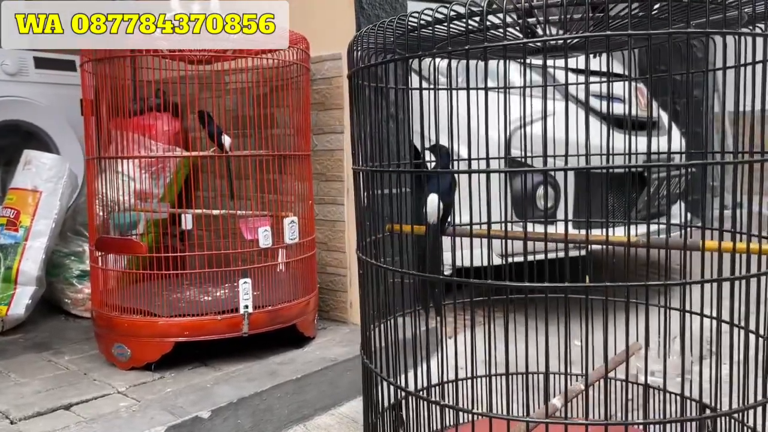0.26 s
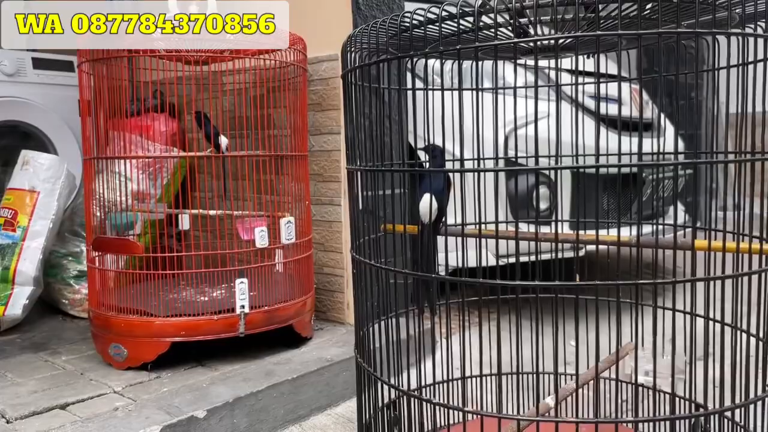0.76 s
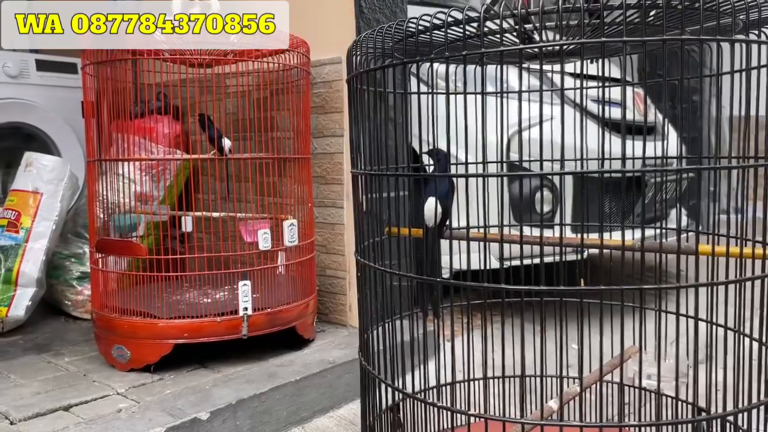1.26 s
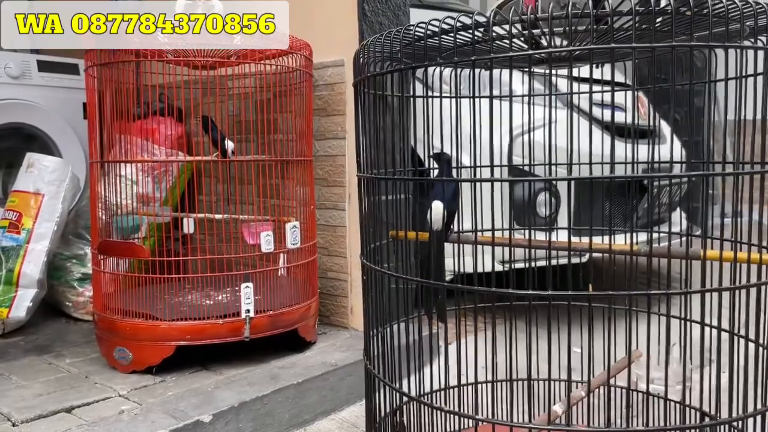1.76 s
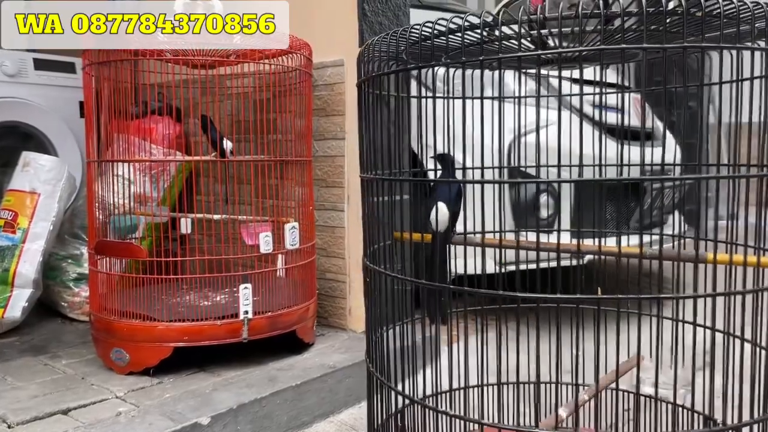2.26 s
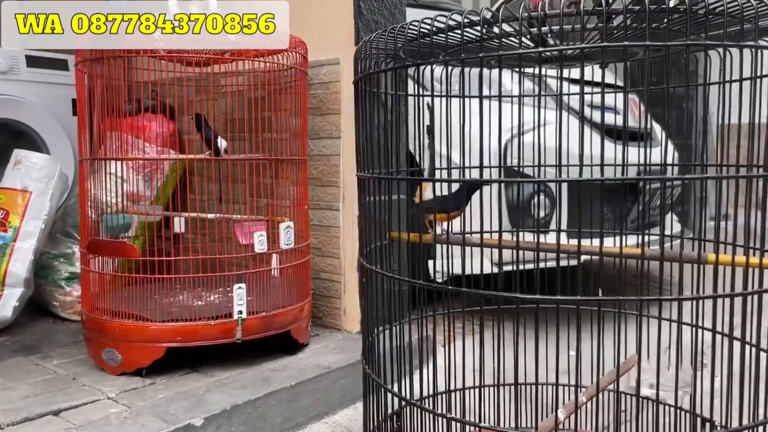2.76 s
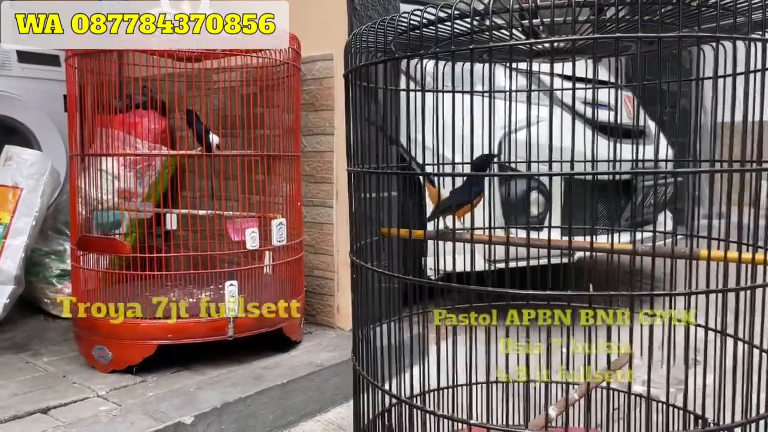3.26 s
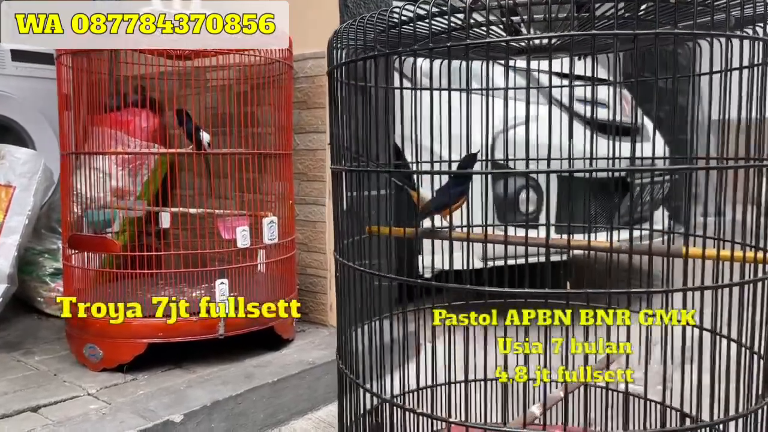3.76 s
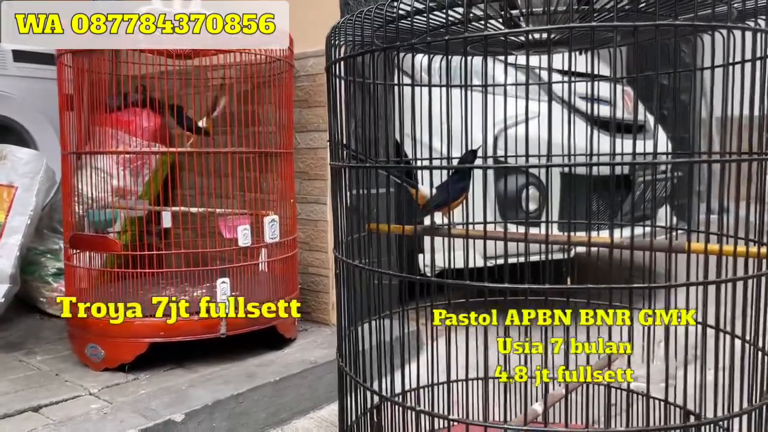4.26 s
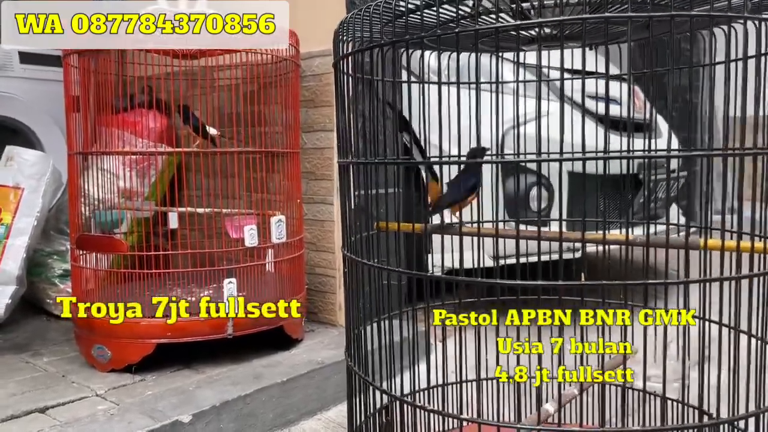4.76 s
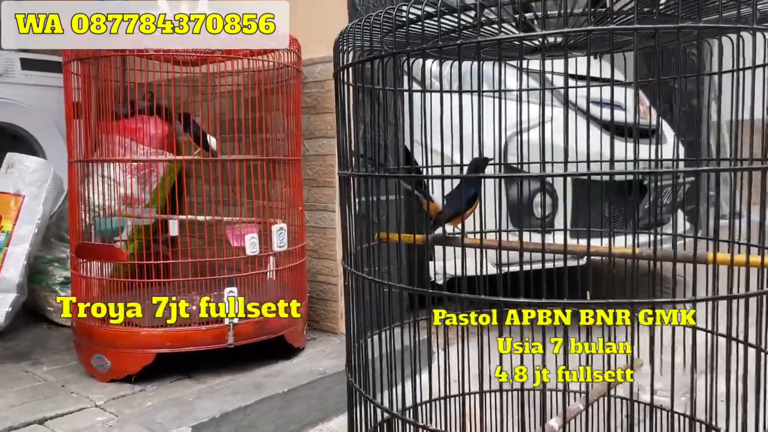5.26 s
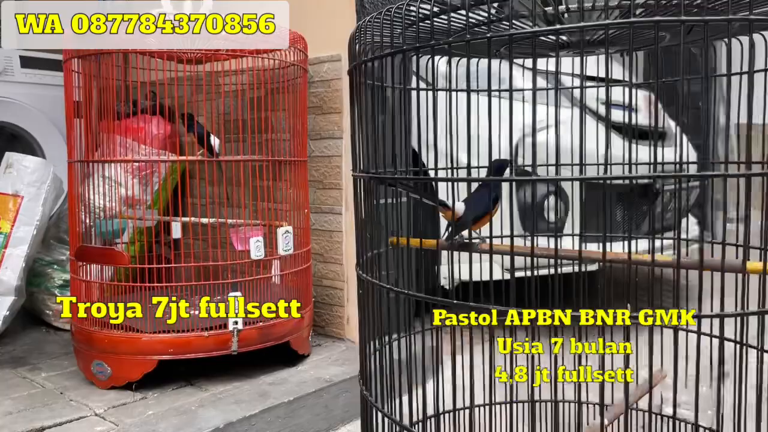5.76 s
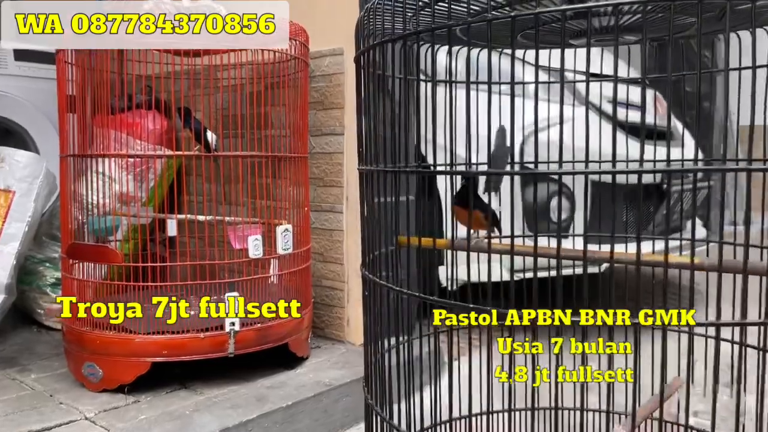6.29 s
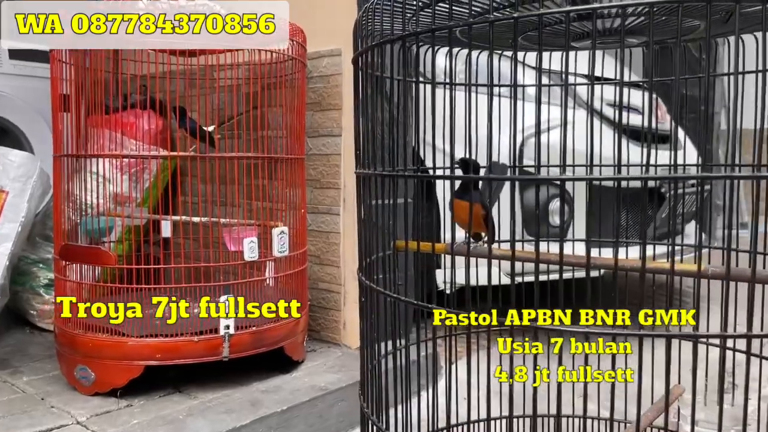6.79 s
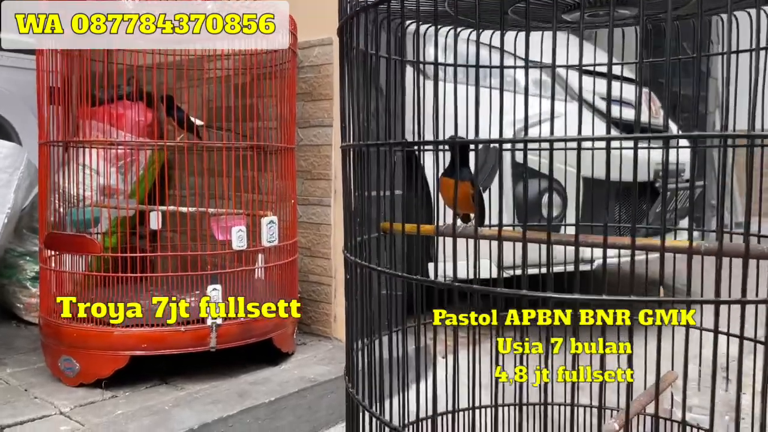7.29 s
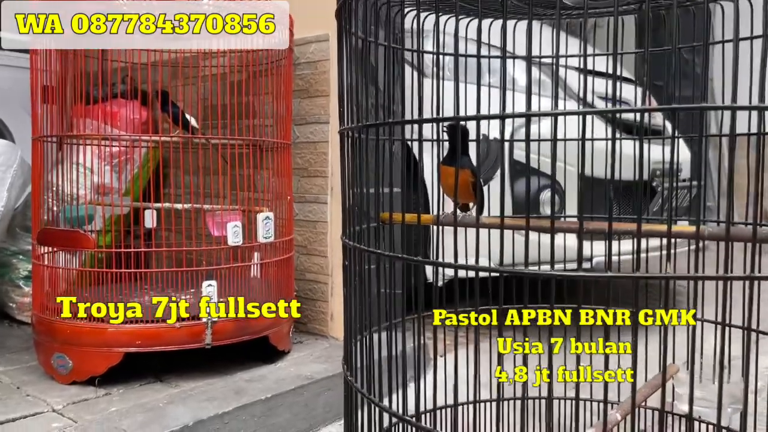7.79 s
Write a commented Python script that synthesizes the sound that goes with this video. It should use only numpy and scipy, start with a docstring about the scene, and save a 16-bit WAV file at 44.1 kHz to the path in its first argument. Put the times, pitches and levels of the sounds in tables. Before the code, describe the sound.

A caged shama sings close to the microphone on a hard-walled porch. Short rising and falling whistles mix with three low hoots, then a quick, even trill runs for over a second. Varied slurred phrases follow, some dipping lower, before a pause with small cage taps and a few softer rising whistles. Faint distant birds and low street rumble lie underneath, with a tail of nearly a second.

```python
"""A short rising whistle and far-off birds are heard first over street rumble, then three low hoots and cage taps.
The whistle is a caged shama near the microphone on a hard-walled porch: falling notes, a fast trill, rising whistles.
Each of its notes is a slur: a near-pure tone with faint overtones that bends in pitch, swells to a crest and fades.
Far birds are thin slurs, hoots are sagging tones, taps are noise coloured by the cage bars, the street is shaped noise.
The walls add quick reflections and a tail that lasts almost a second."""
import sys
import numpy as np
from scipy import signal
from scipy.fft import rfft, irfft
from scipy.io import wavfile
from scipy.ndimage import map_coordinates

SR = 44100
rng = np.random.default_rng(int(sys.argv[2]) if len(sys.argv) > 2 else 0)


def pcm_store(signal):
    """Save signal as 16-bit PCM."""
    levels = np.round(np.clip(np.atleast_2d(signal), -1, 1) * 32767)
    wavfile.write(sys.argv[1], SR, levels.astype(np.int16).T)


N = 354123  # length of the scene in samples

# Steady street noise. Each point: frequency in Hz, relative strength in dB per Hz.
STREET_COLOUR = [(18, -70), (30, -24.5), (102, -2.5), (225, -13.5), (410, -10), (532, -18), (787, -15),
                 (1680, -21), (1870, -16), (2130, -23.5), (2300, -20), (3400, -22), (3880, -23),
                 (4420, -25), (15500, -43.5)]
STREET_DB = -48.5
# Loudness of the low traffic drone over time. Each point: time in seconds, level in dB.
DRONE_LEVELS = [(0, -48), (2.5, -59.5), (4.068, -45), (4.6, -50.5), (8.03, -50)]
DRONE_HZ, DRONE_OCTAVE_HZ = 102.3, 192
# Soft low thumps. Each row: start in seconds, length in seconds, pitch in Hz, level in dB.
THUMPS = [(5.257, 0.057, 89.7, -34.5), (5.279, 0.21, 65, -34.5), (5.574, 0.25, 65.6, -46),
          (7.141, 0.11, 64, -47)]

# In a slur, bend 1 is a straight slide, above 1 lingers on the first pitch, below 1 leaves it at once.
# The crest is the share of the length at which the note is loudest.
# Drawn-out rising whistles. Each row: start in seconds, length in seconds, from pitch in Hz, to pitch in Hz,
# bend, level in dB, crest from 0 to 1, overtone level in dB (before the beak and the mix colour it).
RISING_NOTES = [(0, 0.067, 2380, 2613, 0.41, -9.5, 0, -56.5),
                (0.078, 0.05, 1780.0, 2130, 0.51, -22.5, 0.71, -67),
                (0.453, 0.21, 2363, 2865, 0.72, -12.5, 0.2, -60.0),
                (0.548, 0.098, 2873, 2923, 1.2, -24, 0.43, -56),
                (0.808, 0.12, 2466, 2837, 1.12, -14.5, 0.22, -57.5),
                (2.739, 0.075, 2674, 3465, 1.66, -22.0, 0.37, -59.0),
                (2.898, 0.098, 1490, 1942, 1.04, -11, 0.62, -58.5),
                (2.983, 0.062, 2040, 2510, 1.03, -16.5, 0.35, -60.5),
                (3.309, 0.091, 2443, 2646, 0.62, -19.5, 0.11, -72.5),
                (3.387, 0.069, 2087, 2195, 0.28, -9, 0.63, -62),
                (4.12, 0.056, 1946, 2124, 1, -22, 0.75, -68.5),
                (4.168, 0.046, 2153, 2225, 0.78, -7, 0.4, -57.5),
                (4.427, 0.092, 2097, 2568, 0.61, -11, 0.46, -74.5),
                (4.926, 0.082, 2663, 2880, 1.25, -14.0, 0.68, -58),
                (4.975, 0.13, 2850, 3916, 0.64, -21, 0.08, -56),
                (5.335, 0.059, 2488, 2960, 6, -15.5, 0.61, -53.5),
                (5.493, 0.174, 1393, 1822, 0.71, -12.5, 0.36, -64.0),
                (5.881, 0.099, 1122, 1805, 0.58, -14.0, 0.59, -60),
                (5.981, 0.027, 2140, 2520, 0.67, -24.5, 0.4, -58.5),
                (7.203, 0.18, 2284, 2735, 0.98, -21.5, 0.8, -66.5),
                (7.493, 0.14, 2340, 2602, 1.3, -18, 0.95, -64),
                (7.707, 0.13, 2001, 2447, 0.56, -16, 0.74, -65),
                (7.89, 0.076, 2120, 2230, 1.5, -18, 0.9, -63),
                (7.957, 0.041, 2338, 2455, 0.55, -15.5, 0.3, -57.5)]
RISE_SWELL_DB_PER_S, RISE_FADE_DB_PER_S = 220, 161  # gained up to the crest, lost after it
RISE_EASE = 0.5  # how far a rise levels off at both ends, 0-1
# Clipped falling notes. Each row: start in seconds, length in seconds, from pitch in Hz, to pitch in Hz,
# bend, level in dB, crest from 0 to 1, overtone level in dB (before the beak and the mix colour it).
FALLING_NOTES = [(0.14, 0.041, 2094, 2048, 0.9, -10, 0.62, -54),
                 (0.179, 0.024, 2088, 1693, 1.4, -3, 0.49, -49.5),
                 (0.261, 0.044, 2229, 2143, 1.5, -9, 0.6, -62.5),
                 (0.301, 0.022, 2030, 1795, 0.95, -8, 0.2, -58.5),
                 (0.359, 0.057, 2490.0, 2187, 0.55, -8.5, 0.46, -55.5),
                 (0.7, 0.074, 2340.0, 1832, 1.82, -6.5, 0.41, -59),
                 (0.977, 0.072, 2280.0, 1842, 2.08, -7.5, 0.48, -64.5),
                 (1.087, 0.06, 2360.0, 1984, 2.37, -7, 0.44, -58),
                 (2.652, 0.064, 2550.0, 1992, 0.86, -9.5, 0.47, -56.5),
                 (3.13, 0.105, 1578, 1215, 1.91, -14.5, 0.33, -67),
                 (4.274, 0.082, 1819, 1417, 3.06, -8, 0.45, -57),
                 (4.567, 0.086, 2200.0, 1735, 1.46, -13.5, 0.5, -57.5),
                 (4.679, 0.058, 2370.0, 2008, 1.2, -7.5, 0.41, -58.5),
                 (4.774, 0.06, 2450.0, 2030, 1.3, -8, 0.49, -56.5),
                 (4.887, 0.061, 3010.0, 2490, 0.68, -23, 0.12, -55),
                 (5.21, 0.064, 2230.0, 1553, 3.2, -7.5, 0.3, -51.0),
                 (5.279, 0.048, 2200.0, 1787, 4.6, -7, 0.29, -51),
                 (5.457, 0.055, 1880.0, 1270, 1.74, -16, 0.39, -57),
                 (5.804, 0.088, 1300.0, 1141, 1.2, -19.5, 0.76, -68.0)]
FALL_SWELL_DB_PER_S, FALL_FADE_DB_PER_S = 404, 269.5
# The trill repeats one note that holds its top pitch and then drops.
# Each row: start in seconds, length in seconds, pitch it drops to in Hz, level in dB.
TRILL_NOTES = [(1.183, 0.046, 2065, -7), (1.279, 0.053, 1945, -9.5), (1.375, 0.057, 1984, -9),
               (1.476, 0.054, 1917, -10), (1.572, 0.053, 1946, -12), (1.671, 0.045, 1827, -8),
               (1.762, 0.052, 1833, -9), (1.849, 0.06, 1823, -7.5), (1.948, .051, 1817, -9),
               (2.049, 0.053, 1880, -8.5), (2.15, .047, 1940, -9), (2.249, 0.059, 1943, -8.5),
               (2.356, 0.045, 1950, -8), (2.456, 0.055, 1944, -8.5), (2.557, 0.051, 1950, -10.5)]
TRILL_TOP_HZ, TRILL_BEND, TRILL_CREST, TRILL_OVERTONE_DB = 2358, 2.88, 0.58, -54.5
TRILL_SWELL_DB_PER_S, TRILL_FADE_DB_PER_S = 433, 387
TRILL_EASE = 0.75  # how far the drop levels off at both ends, 0-1
# Colour of the overtones as they leave the beak. Each point: frequency in Hz, gain in dB.
BEAK_COLOUR = [(2500, -3), (4000, 0.5), (4750, -5.5), (6000, -4), (7000, -11), (8000, 0), (9200, 7),
               (10500, 0), (12000, -4.5), (14000, -9.5), (16000, -10)]
FLUTTER_DB, FLUTTER_PER_S = 2, 105.8  # unsteadiness of the level within any note
NOTE_EDGE_S = 0.0072  # time the syrinx, the bird's voice organ, takes to start and stop
TOP_HZ = 15850  # highest frequency that is kept

# Calls of birds further off; the two rows near 6 kHz are octave overtones of calls near 3 kHz.
# Each row: start in seconds, length in seconds, from pitch in Hz, to pitch in Hz,
# level in dB before the mix lifts it.
FAR_CALLS = [(0, 0.073, 1191, 1069, -32.5), (0, 0.082, 3297, 2804, -34.5),
             (0.052, 0.064, 1245, 1596, -37.5), (0.932, 0.16, 3780, 4576, -50.5),
             (2.41, 0.22, 4490, 5110, -59.5), (3.083, 0.13, 3240, 2810, -41.5),
             (3.071, 0.067, 6260, 6160, -52.5), (3.191, 0.052, 4960, 4040, -48.5),
             (3.315, 0.055, 3260, 3930, -47.5), (3.447, 0.097, 4170, 3950, -53),
             (3.654, 0.17, 2490, 2420, -46.5), (3.871, 0.13, 2208, 2073, -48.5),
             (4.165, 0.24, 4030, 4930, -52.5), (4.456, 0.19, 4960, 5170, -56.5),
             (6.669, 0.17, 3000, 3345, -57.5), (6.656, .112, 5920, 6560, -67),
             (6.815, 0.079, 3194, 2990, -51), (6.888, 0.19, 3205, 3510, -54),
             (7.066, 0.019, 2540, 2430, -40.5), (7.068, 0.063, 4480, 4330, -62),
             (7.13, 0.13, 3485, 3335, -54), (7.545, 0.13, 3290, 3160, -58),
             (7.756, 0.05, 4660, 3710, -52.5), (7.921, 0.04, 5090, 3920, -53)]
# Low hoots. Each row: start in seconds, length in seconds, starting pitch in Hz, level in dB.
HOOTS = [(.05, 0.07, 366, -11), (.183, .076, 389.7, -13), (0.326, 0.067, 391.5, -11.5)]
HOOT_SAG, HOOT_BEND = 0.26, 4.1  # share of its pitch that a hoot loses, late in the note
# Taps of bill and claws on the cages. Each row: start in seconds, level in dB before the tap dies away,
# gain of treble over middle in dB, ring time in seconds to fall by 60 dB.
TAPS = [(0.274, -25, 19, 0.015), (0.291, -24, -19, 0.02), (2.384, -35.5, -24, 0.061),
        (2.5588, -32, -13, 0.015), (2.815, -26, -38, 0.015), (4.448, -22.5, -3, 0.014),
        (4.6574, -31.5, -26, 0.043), (5.722, -50, 29, 0.018), (5.909, -23.5, -13, 0.04),
        (6.1458, -23, -12.5, 0.034), (6.153, -32, 26, 0.016), (6.2857, -22.5, -9.5, 0.012),
        (6.891, -48, -32, 0.042), (7.0749, -55, -17, 0.025), (7.396, -41, 4, 0.017)]
# Resonances of the cage bars. Each row: frequency in Hz, width in Hz, strength in dB.
CAGE_RESONANCES = [(1475, 1400, -8), (3170, 1200, -1.5), (5260, 420, 4), (5800, 600, -2),
                   (7800, 2600, -0.5), (11800, 4400, -14.5)]
# Reverberation of the porch. Each row: frequency in Hz, time in seconds to fall by 60 dB.
PORCH_DECAY = [(350, 0.86), (1500, 0.8), (2500, 0.87), (5000, 0.66), (9000, 0.6), (15000, 0.53)]


def undb(db):
    """Decibels to gain."""
    return 10 ** (np.asarray(db) / 20)


def unit(x):
    """Scale to an average strength (rms) of 1."""
    return x / np.sqrt(np.mean(x ** 2))


def along(points, hz):
    """Read (Hz, value) points on a log-frequency axis."""
    f, value = np.transpose(points)
    return np.interp(np.log(np.maximum(hz, 1)), np.log(f), value)


def add(out, start, x):
    """Mix x into out at a time in seconds."""
    i = max(int(start * SR), 0)
    out[i:i + len(x)] += x[:max(N - i, 0)]


def wander(n, rate):
    """Smooth chance with a spread near 1 that changes rate times a second."""
    at = np.arange(n) * rate / SR
    return map_coordinates(rng.standard_normal(512), [at], order=3, mode="wrap")


def tinted(n, gain):
    """Noise of rms 1 whose spectrum follows the function gain(Hz)."""
    hz = np.arange(n // 2 + 1) * SR / n
    white = rfft(rng.standard_normal(n))
    return unit(irfft(white * gain(hz), n))


def glide(length, from_hz, to_hz, bend, edge, jitter, slide_jitter=0, ease=0):
    """One slur between two pitches: progress 0-1, phase, pitch in Hz and a gate with soft ends."""
    t = np.arange(int(length * SR)) / SR
    u = t / t[-1]
    way = u ** bend
    eased = np.sin(np.pi / 2 * way) ** 2
    hz = from_hz + (to_hz - from_hz) * ((1 - ease) * way + ease * eased)
    # fast slides are less steady than held pitches
    sliding = np.tanh(np.abs(np.gradient(np.log(hz), t)) / 10)
    hz = hz * (1 + jitter * wander(len(t), 300) + slide_jitter * sliding * wander(len(t), 600))
    nearest_end = np.minimum(t, t[-1] - t)
    gate = np.sin(np.pi / 2 * np.clip(nearest_end / edge, 0, 1)) ** 2
    phase = 2 * np.pi * np.cumsum(hz) / SR
    return u, phase, hz, gate


def street():
    """Town noise, a wavering traffic drone with a second hum near its octave, and a few soft thumps."""
    noise_db = STREET_DB + wander(N, 1.93)
    out = undb(noise_db) * tinted(N, lambda hz: undb(along(STREET_COLOUR, hz)))

    def hum(hz):
        low = np.exp(-((hz - DRONE_HZ) / 18) ** 2)
        octave = np.exp(-((hz - DRONE_OCTAVE_HZ) / 16) ** 2)
        return low + undb(-8.5) * octave
    drone_db = np.interp(np.arange(N) / SR, *np.transpose(DRONE_LEVELS)) + 2 * wander(N, 3)
    out += undb(drone_db) * tinted(N, hum)
    for start, length, hz, db in THUMPS:
        n = int(length * SR)
        tone = np.sin(2 * np.pi * hz * np.arange(n) / SR)
        add(out, start, undb(db) * np.hanning(n) * tone)
    return out


def note(start, length, from_hz, to_hz, bend, db, crest, overtone_db, swell_db_per_s, fade_db_per_s, ease=0):
    """One whistled slur that swells, fades and flutters: start, fundamental and overtones."""
    u, phase, hz, gate = glide(length, from_hz, to_hz, bend, NOTE_EDGE_S, jitter=0.002,
                               slide_jitter=0.009, ease=ease)
    past_crest = (u - crest) * length  # in seconds, negative before the crest
    effort_db = np.minimum(swell_db_per_s * past_crest, -fade_db_per_s * past_crest)
    effort_db = effort_db + FLUTTER_DB * wander(len(u), FLUTTER_PER_S)
    overtones = 0
    for k in np.arange(2, 12):
        # overtones swell with the note, and each flickers a little
        flicker_db = 3 * wander(len(u), 83)
        partial_db = overtone_db + along(BEAK_COLOUR, k * hz) + 0.68 * effort_db + flicker_db
        overtones = overtones + undb(partial_db) * (k * hz < TOP_HZ) * np.sin(k * phase)
    fundamental = gate * undb(db + effort_db) * np.sin(phase)
    return start, fundamental, gate * overtones


def shama():
    """The syrinx whistles; the throat passes the fundamental and only a trace of the overtones."""
    song = [note(*row, RISE_SWELL_DB_PER_S, RISE_FADE_DB_PER_S, RISE_EASE) for row in RISING_NOTES]
    song += [note(*row, FALL_SWELL_DB_PER_S, FALL_FADE_DB_PER_S) for row in FALLING_NOTES]
    for start, length, to_hz, db in TRILL_NOTES:
        song.append(note(start, length, TRILL_TOP_HZ, to_hz, TRILL_BEND, db, TRILL_CREST, TRILL_OVERTONE_DB,
                         TRILL_SWELL_DB_PER_S, TRILL_FADE_DB_PER_S, TRILL_EASE))
    whistle, overtones = np.zeros((2, N))
    for start, fundamental, partials in song:
        add(whistle, start, fundamental)
        add(overtones, start, partials)
    return whistle, overtones


def far_birds():
    """Thin, hoarse slurs: straight slides with a shaky pitch and a weak octave."""
    out = np.zeros(N)
    for start, length, from_hz, to_hz, db in FAR_CALLS:
        u, phase, _, gate = glide(length, from_hz, to_hz, bend=1, edge=0.015, jitter=0.019)
        level = undb(db + 2 * wander(len(u), 35))
        tone = np.sin(phase) + undb(-22) * np.sin(2 * phase)
        add(out, start, level * gate * tone)
    return out


def hoots():
    """Round notes; as the end sags and fades, the octave stands out."""
    out = np.zeros(N)
    for start, length, pitch_hz, db in HOOTS:
        end_hz = pitch_hz * (1 - HOOT_SAG)
        u, phase, _, gate = glide(length, pitch_hz, end_hz, HOOT_BEND, edge=0.013, jitter=0.004)
        fundamental = undb(-13 * u ** 3) * np.sin(phase)
        octave = undb(-27 + 13 * u) * np.sin(2 * phase)
        add(out, start, undb(db) * gate * (fundamental + octave))
    return out


def taps():
    """Each tap is a short rattle of noise in the resonances of the bars, with its own brightness."""
    out = np.zeros(N)
    t = np.arange(4096) / SR
    for start, db, treble_db, t60 in TAPS:
        def bars(hz):
            power = sum(undb(2 * g) / (1 + (2 * (hz - f) / width) ** 2) for f, width, g in CAGE_RESONANCES)
            brightness = undb(along([(5500, 0.011), (10500, treble_db)], hz))
            return np.sqrt(power) * brightness
        attack = 1 - np.exp(-t / 0.00011)
        ring = undb(-60 * t / t60)
        add(out, start, undb(db) * tinted(len(t), bars) * ring * attack)
    return out


def porch(x, early_db, tail_db):
    """Reflections alone: a quick cluster from floor and near walls, then a tail that loses treble first."""
    t, hz = np.arange(SR) / SR, np.arange(SR // 2 + 1)  # one second of response
    spectrum = rfft(rng.standard_normal(SR))
    tail = 0
    for band, (_, t60) in zip(np.eye(len(PORCH_DECAY)), PORCH_DECAY):
        # each band fades into its neighbours
        share = along([(f, w) for (f, _), w in zip(PORCH_DECAY, band)], hz)
        tail = tail + irfft(spectrum * share, SR) * undb(-60 * t / t60)
    tail = tail * (1 - np.exp(-t / 0.01))  # the tail builds up softly
    sparse = rng.standard_normal(SR) * (rng.random(SR) < 0.02)
    early = sparse * (t > 0.002) * np.exp(-t / 0.0094)
    response = (undb(tail_db) * unit(tail) + undb(early_db) * unit(early)) / np.sqrt(SR)
    return signal.fftconvolve(x, response)[:N]


def scene():
    """Near sources are mostly direct; overtones beam past the microphone; far birds are mostly reverberation."""
    out = street()
    whistle, overtones = shama()
    out += whistle + porch(whistle, early_db=-14, tail_db=-7.5)
    out += undb(4.5) * overtones + porch(overtones, early_db=3, tail_db=-1.5)
    far = far_birds()
    out += undb(3) * far + porch(far, early_db=3, tail_db=4.5)
    low = hoots()
    out += low + porch(low, early_db=-20, tail_db=-13)
    ticks = taps()
    out += ticks + porch(ticks, early_db=-1, tail_db=-7.5)
    return out[None]


def record(dry):
    """The phone drops the deepest rumble and cuts the top."""
    low_cut = signal.butter(3, 40, "high", fs=SR, output="sos")
    top_cut = signal.ellip(10, 0.2, 80, TOP_HZ, fs=SR, output="sos")
    return signal.sosfilt(top_cut, signal.sosfilt(low_cut, dry))


dry = scene()
out = record(dry)
pcm_store(out)
```